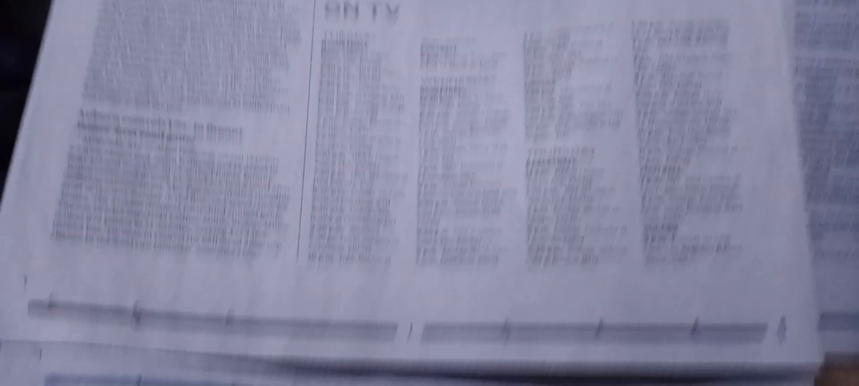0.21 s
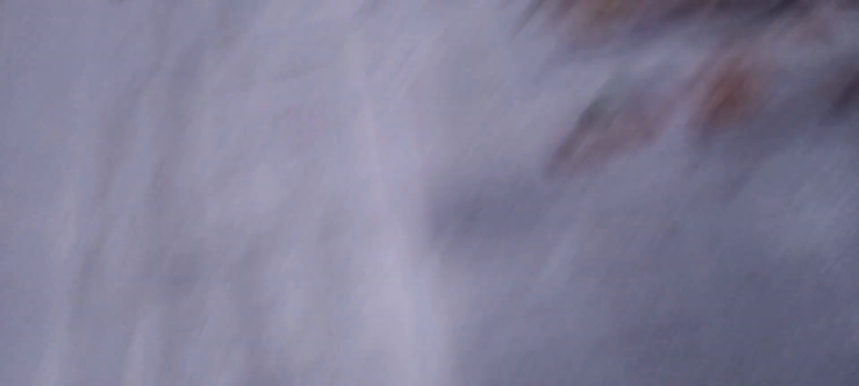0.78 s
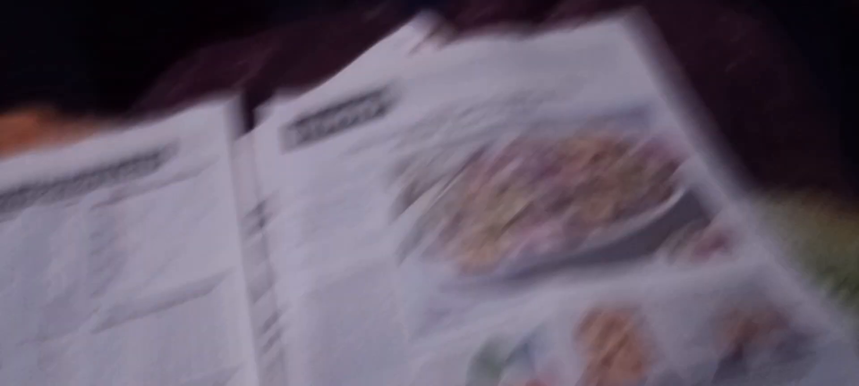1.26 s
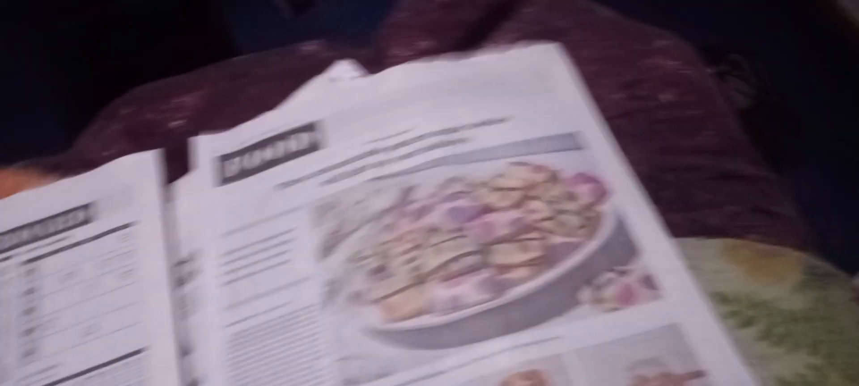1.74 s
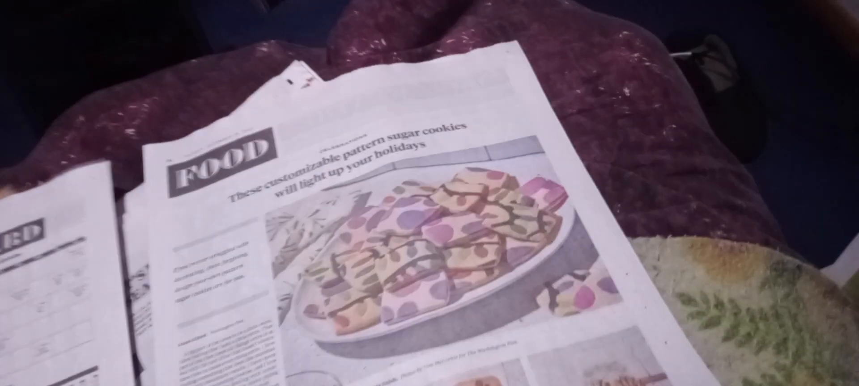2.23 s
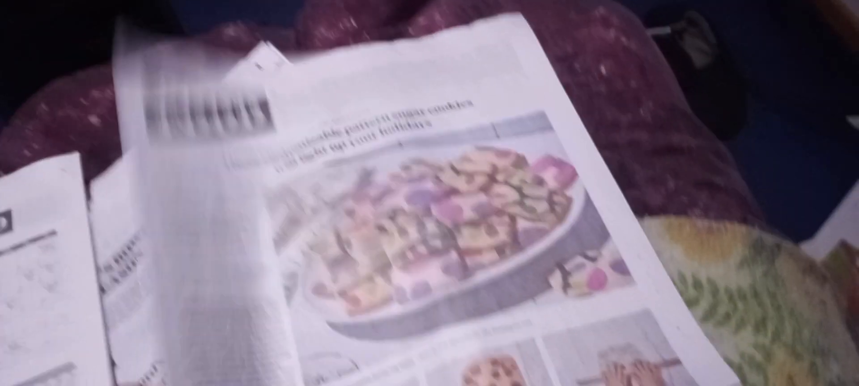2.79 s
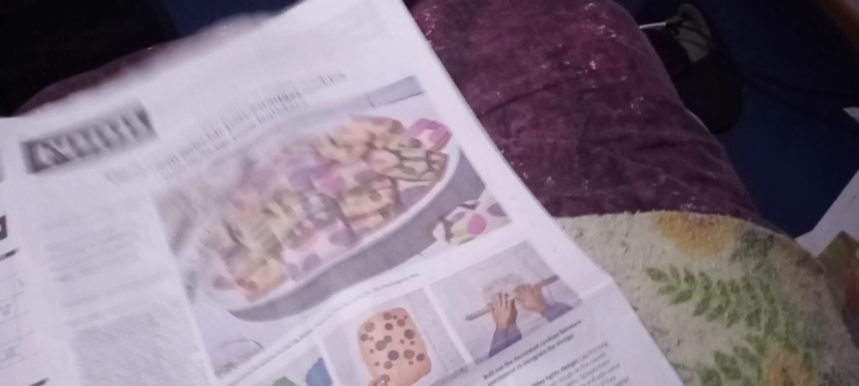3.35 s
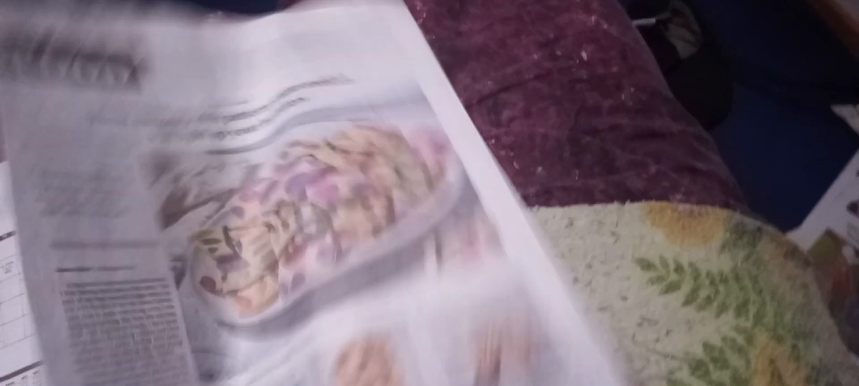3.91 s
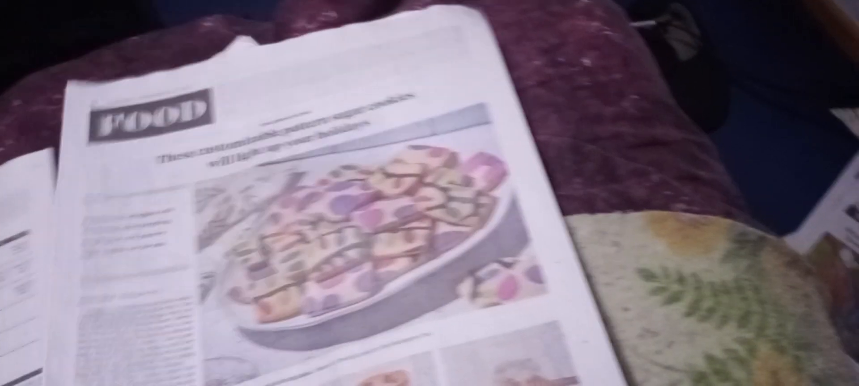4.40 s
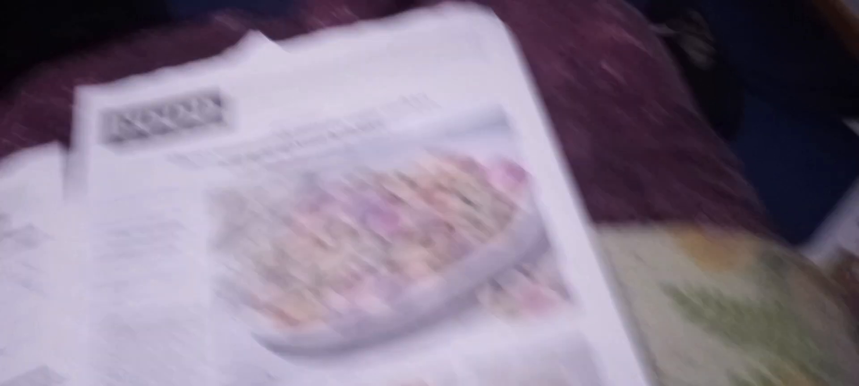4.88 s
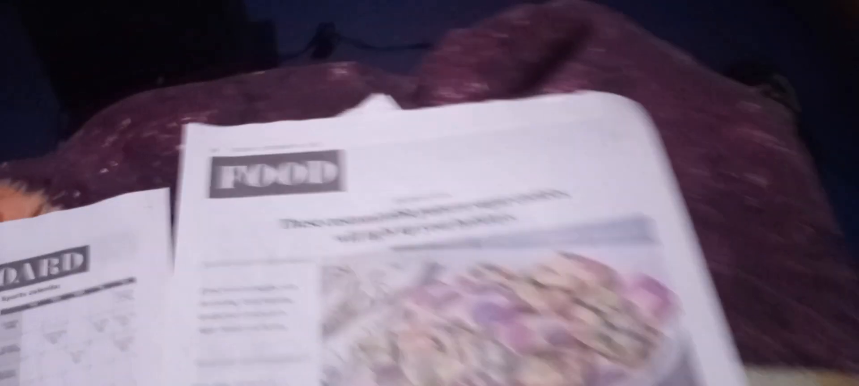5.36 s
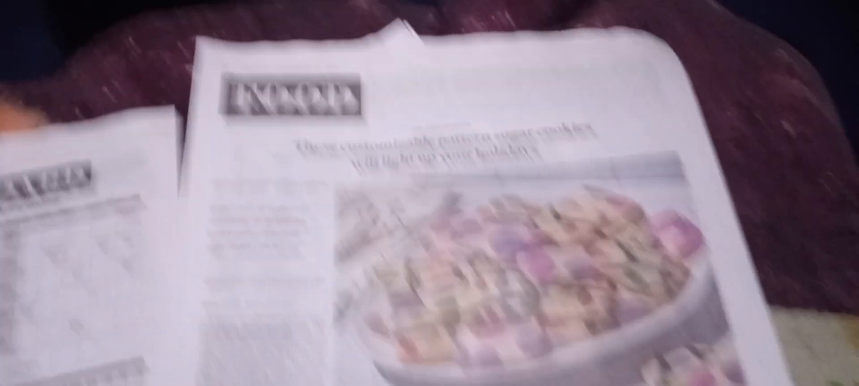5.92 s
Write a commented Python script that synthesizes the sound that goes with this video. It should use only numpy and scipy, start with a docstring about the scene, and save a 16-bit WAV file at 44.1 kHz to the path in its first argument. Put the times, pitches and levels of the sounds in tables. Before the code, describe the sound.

Close, dry newspaper rustle: a page flops over, sheets slide and creases snap in several bursts, fading into faint room hiss.

```python
"""In a quiet, soft room, newspaper sheets are turned and slid over one another by hand, close to a phone.
Sliding paper sounds as dense tiny slips over filtered noise, and bending pages add duller movements.
Creases buckle with dry snaps: a pulse, a decaying crumple and a brief ring. Nearby pages scatter it all.
The left microphone is loud and resonant; the right one hears the paper a little earlier, weaker and flatter.
A low rumble, hiss and soft handling bumps lie underneath."""
import sys
import numpy as np
from scipy import signal
from scipy.fft import rfft, irfft
from scipy.io import wavfile
from scipy.ndimage import uniform_filter1d, map_coordinates

SR = 44100
rng = np.random.default_rng(int(sys.argv[2]) if len(sys.argv) > 2 else 0)


def dump(signal):
    """Clip the signal to [-1, 1] and save it as 16-bit WAV at the path in sys.argv[1]."""
    limited = np.clip(np.atleast_2d(signal).T, -1, 1)
    pcm = np.round(limited * 32767).astype(np.int16)
    wavfile.write(sys.argv[1], SR, pcm)


N = 270774


def undb(db):
    """Logarithmic level: decibels become an amplitude gain."""
    return 10 ** (np.asarray(db) / 20)


def unit(x):
    """Energy normalisation: the same shape with energy 1."""
    return x / np.linalg.norm(x)


def curve(table):
    """Linear interpolation: each column after the time, joined by straight lines."""
    times, *columns = np.transpose(table)
    return [np.interp(np.arange(N) / SR, times, column) for column in columns]


def walk(rate):
    """Smoothed random modulation: levels held 1 / rate seconds and slewed twice; spread near 1."""
    hold = max(int(SR / rate), 1)
    held = np.repeat(rng.standard_normal(N)[:N // hold + 1], hold)
    slewed = uniform_filter1d(uniform_filter1d(held, hold), hold)
    return 1.34 * slewed[:N]


def delay(x, seconds):
    """Propagation delay: the sound arrives a fixed or moving time later, or earlier if negative."""
    return map_coordinates(x, [np.arange(N) - seconds * SR], order=3)


def band_pass(low_hz, high_hz):
    """Band limitation: a second-order Butterworth design."""
    return signal.butter(2, [low_hz, high_hz], "band", fs=SR, output="sos")


def response(hz, db, size=1024):
    """Minimum phase: folding the cepstrum gives a causal impulse response with the given spectrum."""
    f = np.maximum(np.arange(size // 2 + 1) * SR / size, 1)
    spectrum_db = np.interp(np.log(f), np.log(hz), db)
    cepstrum = irfft(np.log(undb(spectrum_db)))
    cepstrum[1:size // 2] *= 2
    cepstrum[size // 2 + 1:] = 0
    return irfft(np.exp(rfft(cepstrum)))


# Noise spectrum of the quiet room and microphone hiss.
# Each row: frequency in Hz, left level in dB per Hz, right level in dB per Hz.
ROOM_NOISE = [(25.43, -105.2, -115.5), (45.4, -102.5, -106.9), (60.0, -86, -96.5), (127, -90, -100),
              (312, -99.5, -107.3), (703, -104.5, -115.3), (910, -101.2, -111.1), (1410, -102.5, -114.9),
              (2210, -100.2, -119.0), (3240, -109.2, -120.7), (7300, -114.8, -128.3),
              (8000, -127.6, -133.2), (13480, -136.8, -129.1), (15700, -135.6, -125.5)]


def quiet_room(floor_db=0, shared_hz=220):
    """Coherence: both microphones share one low rumble, and each adds its own hiss above it."""
    hz, *sides = np.transpose(ROOM_NOISE)
    low, high = (signal.butter(2, shared_hz, kind, fs=SR, output="sos") for kind in ("low", "high"))
    rumble = signal.sosfilt(low, rng.standard_normal(N))
    out = []
    for side_db in sides:
        hiss = signal.sosfilt(high, rng.standard_normal(N))
        out.append(signal.fftconvolve(rumble + hiss, response(hz, side_db, size=8192))[:N])
    # white noise of rms 1 spreads its power over SR / 2 Hz
    return np.array(out) * np.sqrt(SR / 2) * undb(floor_db)


# Soft bumps and creaks of handling.
# Each row: centre in seconds, pitch in Hz, left peak level in dB, time to fall to 1/e in seconds.
HANDLING_BUMPS = [(0.515, 273, -68, 0.057), (0.821, 164.2, -39.5, 0.0092), (1.386, 329, -68.5, 0.065),
                  (2.638, 57.7, -55, 0.053), (4.92, 79, -60, 0.037), (4.93, 872, -66.5, .03)]


def handling(right_db=-9, waver_rate=35):
    """Tone bursts: hands and lap shift with dull bumps and faint creaks of wavering phase."""
    t = np.arange(N) / SR
    bumps = np.zeros(N)
    for centre, hz, db, length in HANDLING_BUMPS:
        swell = np.exp(-((t - centre) / length) ** 2)
        bumps += undb(db) * swell * np.sin(2 * np.pi * hz * t + walk(waver_rate))
    return np.array([bumps, undb(right_db) * bumps])


def room(x, room_db, room_t60=0.067):
    """Reverberation: exponentially decaying noise is the short, weak tail of a furnished room."""
    t = np.arange(SR // 3) / SR
    tail = rng.standard_normal(len(t)) * undb(-60 * t / room_t60) * (t > .006)
    return x + undb(room_db) * signal.fftconvolve(x, unit(tail))[:N]


def scatter(x, near_db, near_s=0.0028, bend_rate=14, count=6):
    """Multipath scattering: pages and lap return sound within milliseconds, by changing paths."""
    t = np.arange(1024) / SR
    paths = rng.standard_normal((count, len(t))) * np.exp(-t / near_s) * (t > .0003)
    # the share of each path changes as the paper bends; their joint power stays constant
    shares = np.array([walk(bend_rate) for _ in paths])
    shares /= np.linalg.norm(shares, axis=0)
    near = sum(share * signal.fftconvolve(x, unit(path))[:N] for share, path in zip(shares, paths))
    return (x + undb(near_db) * near) / np.hypot(1, undb(near_db))


# Air gap under the page as it glides to rest.
# Each row: time in seconds, spacing of its resonances in Hz, reflection from 0 to 1.
AIR_GAP = [(3.36, 1020, 0.04), (3.47, 1000, 0.6), (3.65, 890, 0.2), (3.71, 994, 1), (3.78, 1060, 0.84),
           (3.85, 1140, 0.1)]


def under_sheet(x, low_hz=2400, high_hz=6000):
    """Comb filtering: upper mids bounce in the changing gap under the page, so its resonances glide."""
    spacing, reflection = curve(AIR_GAP)
    trapped = signal.sosfiltfilt(band_pass(low_hz, high_hz), x)
    return x + sum(reflection ** bounce * delay(trapped, bounce / spacing) for bounce in (1, 2))


# The paper moves between the microphones.
# Each row: time in seconds, gain at the right microphone in dB.
TOWARD_RIGHT_PATH = [(0.8, -0.5), (1.1, 0.5), (1.7, -6.5), (2.2, 1.5), (2.75, -0.5), (3.1, -0.5),
                     (4.2, 2.5), (5.2, -1)]


def toward_right(right):
    """Level difference: the right microphone gains or loses as the paper moves."""
    return right * undb(curve(TOWARD_RIGHT_PATH)[0])


# Colour of paper at the microphones.
# Each row: frequency in Hz, left relative level in dB, right relative level in dB.
PAPER_COLOUR = [(84.4, -40.5, -44), (296, -14.5, -23.5), (492, -26, -22), (650, -12, -22.5),
                (1006, -11, -19.5), (1950, 2.5, -23), (3430, -5, -23), (4120, -8, -25), (4870, -19, -25.5),
                (6180, -10, -29), (7300, -14.5, -34), (8920, -41.5, -37), (10720, -63.5, -26.5),
                (13800, -55.5, -39.5), (15780, -42.5, -26.5)]


def microphone_colour(left, right):
    """Linear filtering: each port colours the paper, both scaled by the energy of the left response."""
    hz, left_db, right_db = np.transpose(PAPER_COLOUR)
    left_port, right_port = response(hz, left_db), response(hz, right_db)
    ports = np.array([signal.fftconvolve(left, left_port)[:N], signal.fftconvolve(right, right_port)[:N]])
    return ports / np.linalg.norm(left_port)


def radiate(drives, body_hz=620, hiss_hz=4600):
    """Radiation in bands: three drives sound the sheet's low body, its middle and its hiss."""
    f = np.arange(N // 2 + 1) * SR / N
    low = 1 / (1 + (f / body_hz) ** 4)
    high = 1 - 1 / (1 + (f / hiss_hz) ** 8)
    bands = np.array([low, 1 - low - high, high])
    return irfft((rfft(drives) * bands).sum(axis=0), N)


# each movement dies away in a least time plus a share of its length
RELEASE_S, RELEASE_SHARE = 0.02, .11


def movement(start, length, db, attack_s, sag_db):
    """Power envelope of one movement: attack, sagging hold, release; long ones stop gently."""
    t = np.arange(N) / SR - start
    early = np.maximum(-t, 0) / attack_s
    late = np.maximum(t - length, 0) / (RELEASE_S + RELEASE_SHARE * length)
    sag = sag_db * (np.clip(t / length, 0, 1) - .5)
    return undb(db - sag) ** 2 * np.exp(-2 * np.minimum(early + late, 20))


# A whole page bends or flops over, duller than a slide.
# Each row: start in seconds, length in seconds, relative level in dB, relative low body in dB.
PAGE_BENDS = [(0.81, .05, -30, 18.5), (0.919, 0.11, -43.5, 8.5), (1.018, 0.1, -45.5, 7),
              (1.757, 0.013, -30, 2), (1.874, 0.13, -40, 4), (2.191, 0.056, -21, 5.5),
              (2.439, 0.028, -36.5, -5), (2.538, .13, -53, 7), (2.787, 0.017, -43, -0.5),
              (2.965, 0.074, -28.5, 12.5), (3.284, 0.034, -33.5, 3), (3.329, 0.013, -24.5, -5.5),
              (3.792, .018, -39.5, 8.5)]
BEND_ATTACK_S, BEND_SAG_DB = .004, 0.5
BEND_HISS_DB = -11  # a bend has little hiss


def bending():
    """Flexure: a bend starts at once and sags while it lasts; gives its power, body and hiss."""
    return [(movement(start, length, db, BEND_ATTACK_S, BEND_SAG_DB), body, BEND_HISS_DB)
            for start, length, db, body in PAGE_BENDS]


# Strokes of sheet sliding on sheet; the last row is a faint hiss that fades away.
# Each row: start in seconds, length in seconds, relative level in dB, relative hiss in dB.
SLIDES_AND_LAST_HISS = [(0.057, 0.076, -63.5, 3), (0.542, 0.17, -61.5, 5), (0.803, 0.049, -30.5, 1.5),
                        (0.88, 0.076, -41.5, 5.5), (1.054, 0.029, -39.5, -1), (1.306, 0.32, -63, 1.5),
                        (1.47, 0.022, -32.5, 2), (1.486, 0.3, -48, 7), (1.612, 0.042, -31, 5),
                        (1.67, 0.051, -45.5, 8), (1.796, 0.25, -36, 3), (1.991, 0.18, -29, 8),
                        (2.207, 0.18, -30.5, 5), (2.655, 0.5, -55, 5.5), (2.843, 0.084, -42.5, 1),
                        (2.905, 0.069, -31, 0), (3.004, .15, -27, 3.5), (3.189, 0.13, -30, -2),
                        (3.429, 0.24, -46.5, 6), (3.714, 0.082, -46, 8), (3.76, 0.0086, -44, 12),
                        (3.88, .1, -53.5, 5.5), (4.022, .42, -60, 3), (4.162, 0.09, -57.5, 3),
                        (4.236, .04, -53.5, 7.5), (4.555, 0.31, -67.5, 1)]
SLIDE_ATTACK_S, SLIDE_ATTACK_SHARE, SLIDE_SAG_DB = .004, 0.1, 1.5
SLIDE_BODY_DB = -6.5  # little low body


def stroking():
    """Friction envelopes: each row swells in, slower when long, then sags; gives power, body and hiss."""
    strokes = []
    for start, length, db, hiss in SLIDES_AND_LAST_HISS:
        attack_s = SLIDE_ATTACK_S + SLIDE_ATTACK_SHARE * length
        strokes.append((movement(start, length, db, attack_s, SLIDE_SAG_DB), SLIDE_BODY_DB, hiss))
    return strokes


def contact(rest_db=-77, rest_body_db=10):
    """Addition of powers: slides, the last hiss and bends over the faint stir of held paper."""
    parts = stroking() + bending() + [(undb(rest_db) ** 2, rest_body_db, 0)]
    total = sum(power for power, _, _ in parts)
    body = sum(power * undb(db) ** 2 for power, db, _ in parts)
    hiss = sum(power * undb(db) ** 2 for power, _, db in parts)
    # level, then body and hiss against it, in dB
    return 10 * np.log10([total, body / total, hiss / total])


# Creases that buckle.
# Each row: start in seconds, relative level in dB, relative hiss in dB, ring of the flipped patch in Hz.
CREASE_SNAPS = [(0.7836, -30.5, -15, 2200), (0.7909, -21, -6.5, 1230), (0.814, -24.5, -8, 3450),
                (0.8197, -12, -2.5, 1100), (0.839, -21.5, 2, 2300), (0.852, -29, -4, 1900),
                (0.8734, -20, -2.5, 2400), (0.8766, -17, 1, 2800), (0.9407, -33.5, 6, 4300),
                (0.9911, -31, 1.5, 3600), (1.0435, -21.5, -6, 2400), (1.053, -31, -19, 1950),
                (1.0676, -23.5, -1, 950), (1.1535, -41, -18, 1200), (1.4683, -34, -11, 1900),
                (1.4795, -31.5, 6, 4200), (1.7601, -24, 4, 1000), (1.7631, -18, -25.5, 1900),
                (1.886, -19, -19, 2300), (1.9086, -20.5, -8.5, 1100), (1.9282, -13, -2.5, 3100),
                (1.9703, -23.5, 3.5, 1600), (2.082, -18.5, -13, 2400), (2.1135, -23.5, -15.5, 1800),
                (2.1818, -21.5, -3, 2500), (2.1935, -21, -19.5, 2150), (2.3362, -19.5, 10, 940),
                (2.4463, -28, -40, 1850), (2.5777, -39.5, -23, 1800), (2.638, -33, -11, 3700),
                (2.778, -39.5, -15, 2500), (2.7926, -36.5, -28, 2000), (2.8907, -21, -11, 746),
                (2.9679, -18.5, -2.5, 3700), (2.9739, -17.5, -5.5, 2000), (2.978, -22, 7.5, 1600),
                (3.0652, -20, 3.5, 1500), (3.086, -17, -13, 2300), (3.2033, -21.5, -14.5, 1700),
                (3.2182, -19.5, 8, 2300), (3.2668, -19, 1.5, 1600), (3.287, -19.5, -8, 1900),
                (3.3087, -19.5, -4, 3900), (3.4509, -26, -42, 1790), (3.6776, -40, -9, 1700),
                (4.245, -46.5, 0, 3500)]
PATCH_LOUDER_DB = 6.5  # ring level gained for each octave lower
# a crease that flips faster hisses more and crumples for less time:
# time constant at 0 dB of hiss, and the hiss that halves it
CRUMPLE_S, CRUMPLE_HALVES_DB = 0.00062, 14.5
# a bending page lends a crease a share of its low body
CREASE_BODY_DB, BODY_SHARE = -5, 0.53


def snapping(page_body, snap_db=-1.5, hiss_db=1, crumple_s=0.00023, ring_db=-13, ring_hz=2000,
             ring_cycles=2.9, flutter_s=0.0041, flutter_db=-23):
    """Buckling: a crease flips with a sharp pulse; its patch rings as the sheet crumples and flutters."""
    drives, t = np.zeros((3, N)), np.arange(2048) / SR
    span = .005 * SR  # samples over which the level is an rms
    noises = rng.standard_normal((len(CREASE_SNAPS), len(t)))
    for (s, db, hiss, hz), noise in zip(CREASE_SNAPS, noises):
        start = int(s * SR)
        decay = CRUMPLE_S * 2 ** (-hiss / CRUMPLE_HALVES_DB)
        tail = noise * (np.exp(-t / decay) + undb(flutter_db) * np.exp(-t / flutter_s))
        # crumple outweighs the pulse in every snap, and most of all in slow creases
        snap = unit((t == 0) + np.sqrt(decay / crumple_s) * unit(tail))
        # larger patches ring lower and louder
        patch_db = ring_db + PATCH_LOUDER_DB * np.log2(ring_hz / hz)
        ring = undb(patch_db) * unit(np.sin(2 * np.pi * hz * t) * np.exp(-t * hz / ring_cycles))
        colour = undb([[CREASE_BODY_DB + BODY_SHARE * page_body[start]], [0], [hiss + hiss_db]])
        drives[:, start:start + len(t)] += undb(db + snap_db) * np.sqrt(span) * (colour * snap + ring)
    # a small patch radiates little bass, and it cannot flip infinitely fast
    return signal.sosfilt(band_pass(380, 11000), radiate(drives))


def slips(rate, spread_db, rub_db):
    """Stick-slip: fibres catch and let go in ticks of very unequal size over a smooth rub, rms 1."""
    sizes = undb(spread_db * np.minimum(rng.exponential(size=N), 3.6))
    happens = rng.random(N) < rate / SR
    ticks = happens * sizes * rng.choice([-1, 1], N) / np.sqrt(rate)
    x = ticks / np.std(ticks) + undb(rub_db) * rng.standard_normal(N)
    return x / np.std(x)


def sliding(level, body, hiss, slide_db=-0.52, body_db=-2.0, hiss_db=1.74, judder_db=-0.3,
            flicker_db=1.9, firm_db=-49, slow_rate=220, quick_rate=1700, quick_db=-27):
    """Dry friction: light contact hisses with few ticks; quick, firm contact crackles and judders."""
    firm = 1 / (1 + undb(firm_db - level))
    slip_rate = slow_rate + quick_rate * undb(level - quick_db)  # per second
    ticks = slips(slip_rate, spread_db=5.0, rub_db=-1.0)
    grain = np.sqrt(firm) * ticks + np.sqrt(1 - firm) * rng.standard_normal(N)
    drive = grain * undb(level + slide_db + judder_db * firm * walk(110))
    # each band flickers on its own
    bands_db = (body + body_db, 0, hiss + hiss_db)
    return radiate(np.array([drive * undb(db + flicker_db * walk(45)) for db in bands_db]))


LEFT_LAG_S = 0.001226  # the right microphone hears the paper this much earlier


def scene(far_side_db=3):
    """Superposition: the paper as each microphone hears it, over the quiet room and handling."""
    level, body, hiss = contact()
    snaps = snapping(body)
    # a page is wide: its far side rubs on its own and reaches only the right microphone
    near_side, far_side = (under_sheet(sliding(level, body, hiss)) for _ in range(2))
    whole_page = (near_side + undb(far_side_db) * far_side) / np.hypot(1, undb(far_side_db))
    left = room(scatter(near_side + snaps, near_db=-6.5), room_db=-17.5)
    right = room(scatter(delay(whole_page + snaps, -LEFT_LAG_S), near_db=4.0), room_db=-6.5)
    paper = microphone_colour(left, toward_right(right))
    return paper + quiet_room() + handling()


TOP_HZ = 15900  # upper edge of the phone's band


def record(dry):
    """Saturation and band limiting: the phone rounds off the sharpest snaps and cuts the top."""
    ceiling = .6
    rounded = ceiling * np.tanh(dry / ceiling)
    # tenth order, 0.2 dB ripple, 70 dB rejection
    return signal.sosfilt(signal.ellip(10, .2, 70, TOP_HZ, fs=SR, output="sos"), rounded)


dry = scene()
out = record(dry)
dump(out)
```